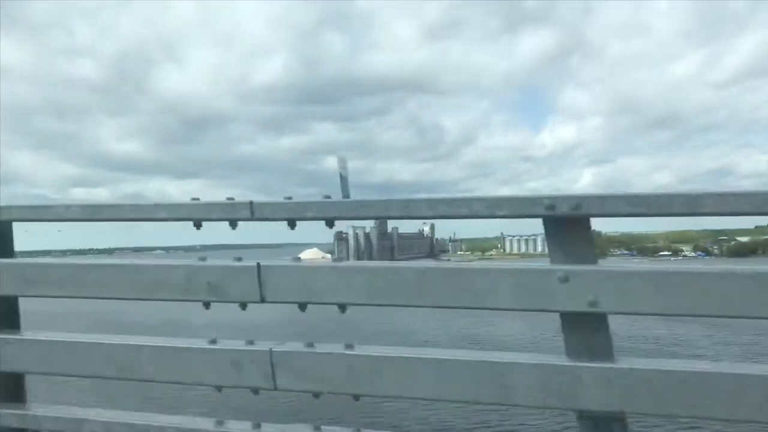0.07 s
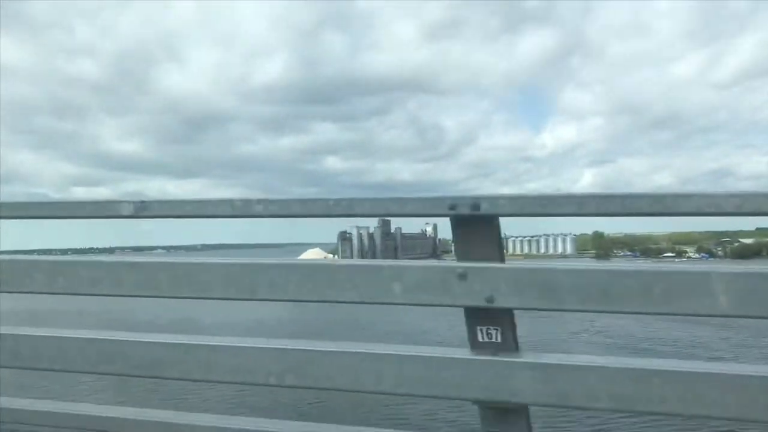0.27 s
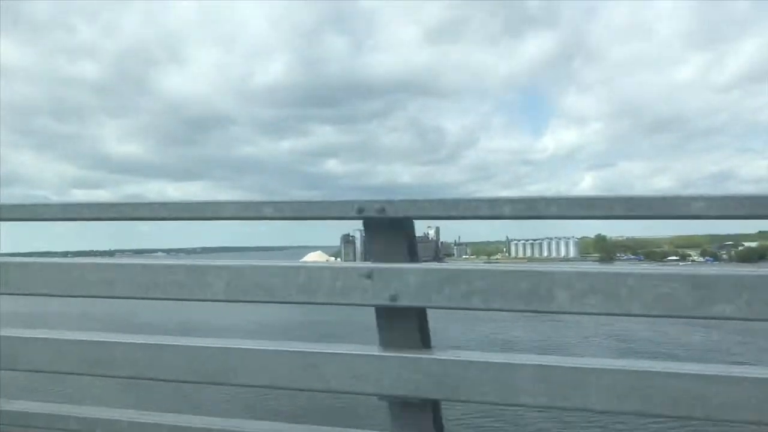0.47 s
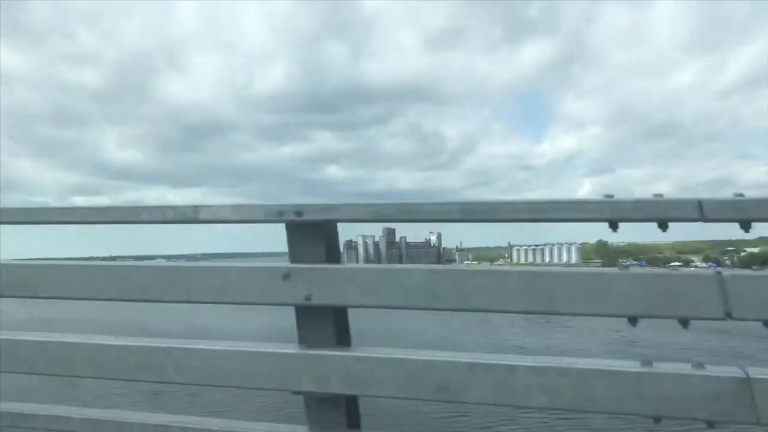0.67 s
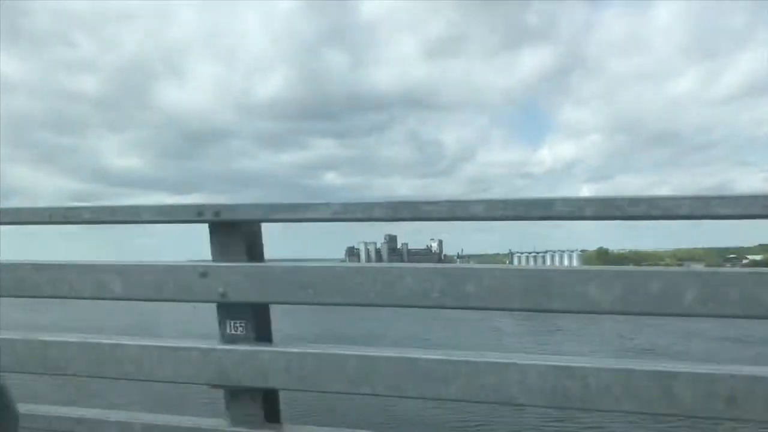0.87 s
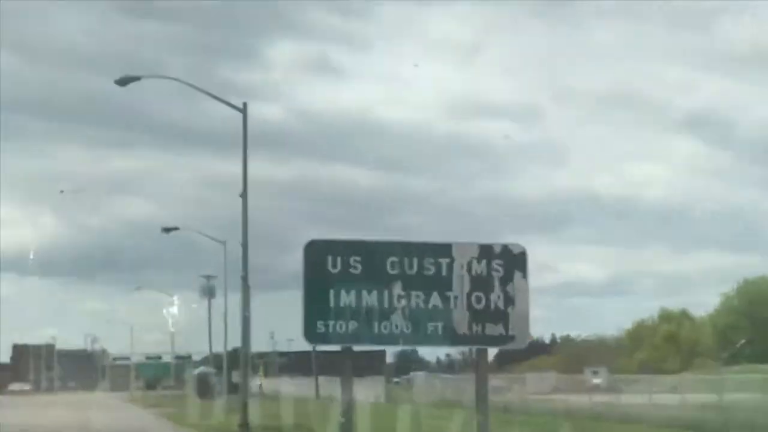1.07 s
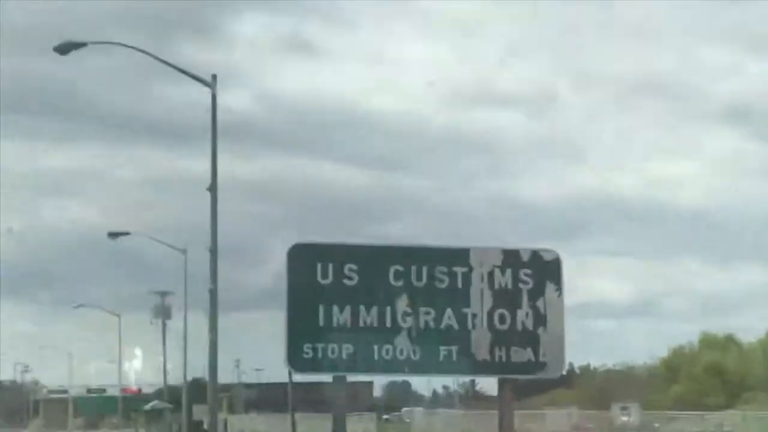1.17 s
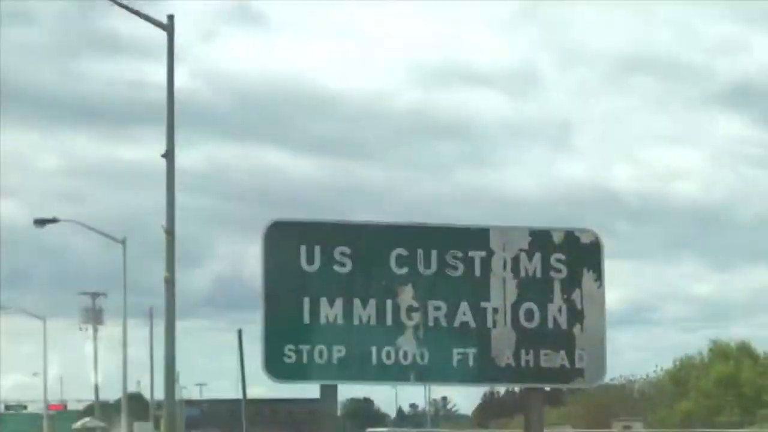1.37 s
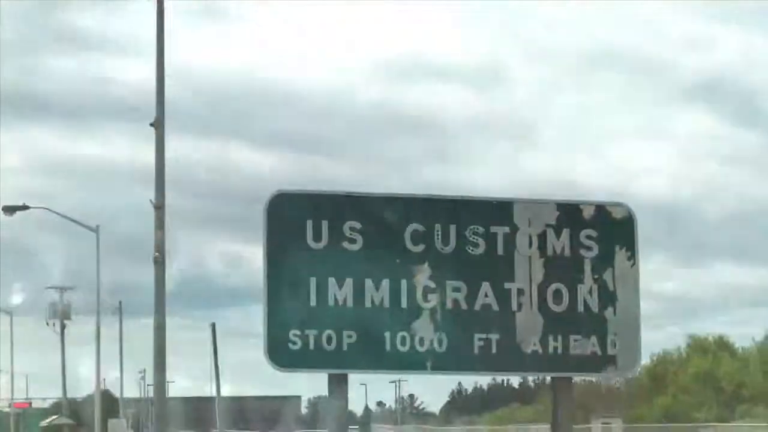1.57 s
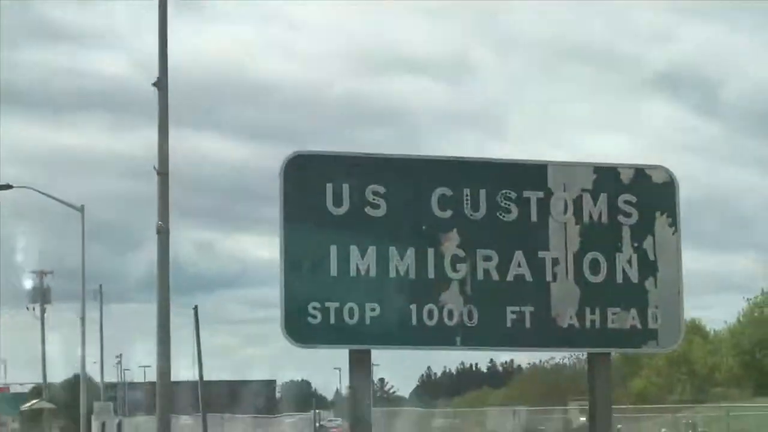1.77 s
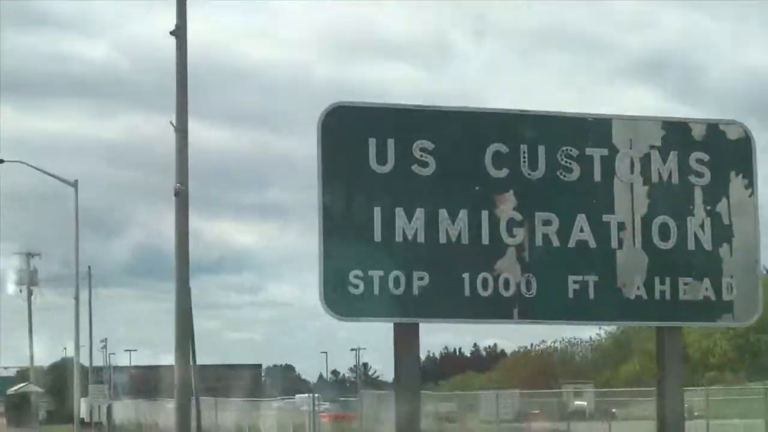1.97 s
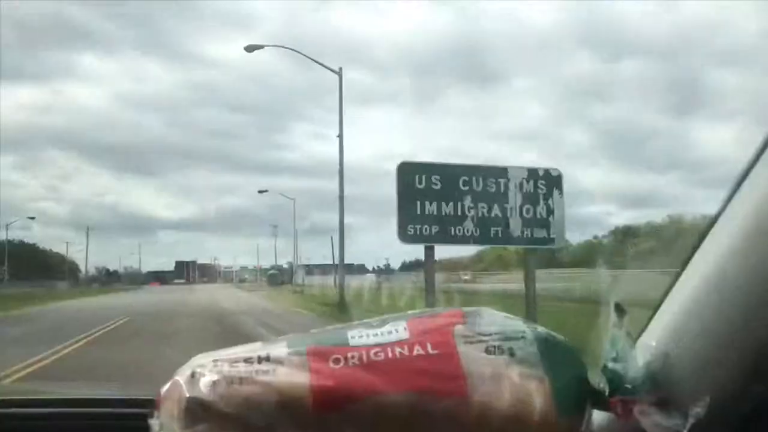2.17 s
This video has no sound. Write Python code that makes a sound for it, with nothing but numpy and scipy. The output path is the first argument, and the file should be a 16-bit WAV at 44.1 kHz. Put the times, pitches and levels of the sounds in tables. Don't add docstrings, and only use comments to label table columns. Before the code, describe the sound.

Car tyres hum over steel bridge grating for about a second, pulsing at the joints; a quick cut brings quieter, boomy road noise, body bumps and tiny plastic rattles, captured close inside the cabin.

```python
import sys
import numpy as np
from scipy import signal
from scipy.fft import rfft, irfft, next_fast_len
from scipy.io import wavfile
from scipy.ndimage import uniform_filter1d, map_coordinates

SR = 44100
rng = np.random.default_rng(int(sys.argv[2]) if len(sys.argv) > 2 else 0)


def volts_from_decibels(level):
    exponent = np.asarray(level, float) / 20
    return 10 ** exponent


def store_pcm(level_fs):
    pcm = np.round(np.clip(level_fs, -1, 1) * 32767).astype(np.int16)
    wavfile.write(sys.argv[1], SR, np.atleast_2d(pcm).T)


N = 97593

# start_s, bright_db, dull_db
TRIM_TICKS = [
    (0.9128, -45.5, -54),
    (1.0664, -61.5, -61),
    (1.2366, -61, -59),
    (1.3503, -58.5, -65),
    (1.4114, -60, -56.5),
    (1.5868, -54.5, -58.5),
    (1.6054, -54, -57),
    (1.696, -55, -64),
    (1.735, -47, -53),
    (1.7644, -57, -57.5),
]
# start_s, level_db
DASH_KNOCKS = [
    (1.066, -45),
    (1.172, -41),
    (1.948, -47),
]
# freq_hz, density_db_per_hz
KNOCK_SPECTRUM = [(450, -8), (520, 0), (720, -1), (850, -10)]
# start_s, length_s, pitch_hz, level_db
TRIM_SQUEAKS = [
    (1.513, .024, 2780, -60),
    (1.28, .02, 4000, -73),
    (1.94, .02, 2900, -68),
]
# start_s, end_s, over_calm_hiss_db
SHAKE_FITS = [(1.05, 1.145, 4.5), (1.145, 1.25, 1.5), (1.40, 1.47, 5), (1.47, 1.50, 3.5), (1.50, 1.58, 4.5),
              (1.58, 1.72, 6), (1.72, 1.775, 7), (1.775, 1.92, 3.5), (1.92, 2.0, 6.5), (2.0, 2.055, 5.5),
              (2.195, 2.3, 6)]
# freq_hz, density_db_per_hz
HISS_SPECTRUM = [(1200, -11), (2500, -4.5), (5000, -6.5), (8000, -10.5), (10500, -13), (13000, -11),
                 (15000, -14.5), (15700, -15)]
# freq_hz, density_db_per_hz
ROAD_SPECTRUM = [(25, -33), (45, -2.5), (210, -5.5), (260, -18), (400, -22.5), (470, -30.5), (1000, -29.5),
                 (3500, -55.5)]
# freq_hz, density_db_per_hz
TYRE_SPECTRUM = [(250, -10.5), (300, -3.5), (370, 3), (420, -4.5), (460, -17)]
# time_s, boom_db
ROAD_BUMPS = [
    (1.05, -31.5),
    (1.198, -36.5),
    (1.404, -29),
    (1.562, -30.5),
    (1.614, -23.5),
    (1.982, -34),
    (2.21, -34),
]
# freq_hz, density_db_per_hz
BOOM_SPECTRUM = [(22, -32), (38, 2.5), (95, -7), (112, 0), (135, -16), (230, -24.5), (300, -45.5)]
# start_s, length_s, pitch_hz, peak_db
BODY_THUMPS = [(1.08, 0.078, 46.2, -20.5), (1.27, 0.04, 101.5, -37.5), (1.36, 0.057, 106.4, -16),
               (1.395, 0.059, 112, -14), (1.44, 0.071, 108.4, -20), (1.36, 0.14, 57.7, -21),
               (1.57, 0.096, 140.7, -22), (1.54, 0.12, 69.4, -20.5), (1.64, 0.17, 39.8, -21),
               (1.69, 0.041, 72.5, -20), (1.70, 0.078, 109.6, -17), (1.86, 0.038, 56, -23),
               (1.91, .07, 87.2, -18), (2.01, 0.045, 42, -21), (2.15, 0.086, 107.4, -28)]
# freq_hz, width_hz, rms_db
DECK_RINGS = [(83.3, 10, -26.5), (112, 20, -32.5), (303, 100, -36), (424.5, 14, -58), (597.5, 60, -39.5),
              (670, 90, -44.5), (1700, 370, -62), (2618, 340, -65), (3020, 280, -69)]
# freq_hz, density_db_per_hz
DECK_SPECTRUM = [(25, -31.5), (45, -4.5), (160, -5.5), (450, -25), (900, -35), (2200, -48.5), (3400, -56.5),
                 (5000, -75)]
# time_s, level_db
PANEL_GRIP = [
    [(0.0, -28.5), (0.028, -14), (0.05, -11), (0.325, -25.5)],
    [(0.325, -17), (0.347, -18), (0.391, -12), (0.525, -21), (0.555, -16.5), (0.635, -21)],
    [(0.635, -21.5), (0.683, -16), (0.743, -14), (0.841, -23), (0.933, -16.5), (0.966, -29.5)],
    [(0.966, -16), (0.99, -14), (1.02, -17.5)],
]
# time_s, slip_cycles
PANEL_JOINTS = [
    (0, .7),
    (.325, .45),
    (.965, 0.42),
]
# bar_rate_multiple, level_db, grip_follow_0_to_1
DRONE_ORDERS = [(.5, -20.5, .3), (1.5, -28.5, 0.4), (2, -21.5, 0), (2.5, -32, .2), (3, -38, 1),
                (3.5, -54.5, .2), (4, -41.5, 1), (5, -50.5, .3), (6, -51, .3)]


def unit(x):
    return x / np.sqrt(np.mean(x ** 2) + 1e-20)


def curve(rows):
    time_s, value = np.transpose(rows)
    return np.interp(np.arange(N) / SR, time_s, value)


def wobble(rate_hz):
    knots = rng.standard_normal(int(N * rate_hz / SR) + 4)
    return map_coordinates(knots, [np.arange(N) * rate_hz / SR])


def filtered(x, response):
    size = next_fast_len(N + 8192)
    return irfft(rfft(x, size) * response(np.fft.rfftfreq(size, 1 / SR)), size)[:N]


def coloured(x, spectrum):
    freq_hz, level_db = np.transpose(spectrum)

    def response(hz):
        return volts_from_decibels(np.interp(np.log(hz + 1), np.log(freq_hz + 1), level_db, -120, -120))

    return unit(filtered(x, response))


def noise(patchy_db=2):
    z = signal.stft(rng.standard_normal(N + 512), nperseg=512)[2]
    field = uniform_filter1d(rng.standard_normal(z.shape), size=2, axis=0)
    field = uniform_filter1d(field, size=5, axis=1)
    return signal.istft(z * volts_from_decibels(patchy_db * unit(field)), nperseg=512)[1][:N]


def bursts(rows):
    t, out = np.arange(N) / SR, np.zeros(N)
    for (start_s, length_s, hz, db), phase in zip(rows, rng.random(len(rows))):
        envelope = np.sin(np.pi * np.clip((t - start_s) / length_s, 0, 1)) ** 2
        out += volts_from_decibels(db) * envelope * np.sin(2 * np.pi * (hz * (t - start_s) + phase))
    return out


def trim():
    tick_t60_s, tail_t60_s, tail_db = .008, .034, -8
    dull_t60_s, knock_t60_s, knock_rise_s = .043, .13, .004
    bright_spectrum = [(5000, -11), (7500, -3.5), (10500, -8.5), (14000, -5), (15700, -5.5)]
    dull_spectrum = [(1200, 2), (3000, 0.5), (5500, -10.5)]
    bright, dull, knock = np.zeros(N), np.zeros(N), np.zeros(N)
    t = np.arange(SR // 10) / SR
    bright_decay = volts_from_decibels(-60 * t / tick_t60_s) + volts_from_decibels(tail_db - 60 * t / tail_t60_s)
    for start_s, bright_db, dull_db in TRIM_TICKS:
        i = round(start_s * SR)
        bright[i:][:len(t)] += volts_from_decibels(bright_db - 5) * bright_decay
        dull[i:][:len(t)] += volts_from_decibels(dull_db - 1.0 - 60 * t / dull_t60_s)
    for start_s, db in DASH_KNOCKS:
        rise = 1 - np.exp(-t / knock_rise_s)
        knock[round(start_s * SR):][:len(t)] += volts_from_decibels(db - 60 * t / knock_t60_s) * rise
    ticks = bright * coloured(noise(), bright_spectrum) + dull * coloured(noise(), dull_spectrum)
    return ticks + knock * coloured(noise(), KNOCK_SPECTRUM) + bursts(TRIM_SQUEAKS)


def road():
    road_db, road_follow, hiss_db = -36.5, .05, -72
    tyre_db, tyre_follow, fit_edge_s = -51.5, .77, .012
    t, boom_db = np.arange(N) / SR, curve(ROAD_BUMPS)
    shake_db = np.zeros(N)
    for start_s, end_s, db in SHAKE_FITS:
        rise = np.clip((t - start_s) / fit_edge_s, 0, 1)
        fall = np.clip((t - end_s) / fit_edge_s, 0, 1)
        shake_db += db * (rise - fall)
    boom = volts_from_decibels(boom_db) * coloured(noise(patchy_db=0.0), BOOM_SPECTRUM)
    roll_gain = volts_from_decibels(road_db + road_follow * shake_db + 0.71 * wobble(12))
    roll = roll_gain * coloured(noise(), ROAD_SPECTRUM)
    hiss = volts_from_decibels(hiss_db + shake_db + 0.87 * wobble(40)) * coloured(noise(), HISS_SPECTRUM)
    tyre_gain = volts_from_decibels(tyre_db + tyre_follow * (boom_db - boom_db[SR:].mean()))
    tyre = tyre_gain * coloured(noise(), TYRE_SPECTRUM)
    return tyre + boom + bursts(BODY_THUMPS) + roll + hiss


def deck(cycles):
    rolling_db, gated_share, fade_db_per_s = -26.5, .18, 3
    hum_hz, hum_db = 203.1, -29.5
    panel_s, flex_peak_s, flex_db = .32, .29, 4
    hiss_db, hiss_start_s = -66, .04
    t = np.arange(N) / SR

    def pulsed():
        return noise(patchy_db=1.45) * (1 + gated_share * np.cos(2 * np.pi * cycles))

    out = volts_from_decibels(rolling_db + 0.41 * wobble(6.7)) * coloured(pulsed(), DECK_SPECTRUM)
    out += volts_from_decibels(hum_db + 3.6 * wobble(9)) * np.sin(2 * np.pi * (hum_hz * t + 0.046 * wobble(18)))
    swell_db = flex_db * np.cos(2 * np.pi * (t - flex_peak_s) / panel_s)
    for k, (hz, width_hz, db) in enumerate(DECK_RINGS):
        def resonance(f):
            return (1j * f * width_hz / (hz * hz - f * f + 1j * f * width_hz)) ** 2

        ring = filtered(pulsed(), resonance)
        out += volts_from_decibels(db + 0.5 * wobble(6) + swell_db * (k == 0)) * unit(ring)
    hiss_gain = volts_from_decibels(hiss_db + .8 * wobble(8.7) - 6 * (t < hiss_start_s))
    return out * volts_from_decibels(-fade_db_per_s * (t - .5)) + hiss_gain * coloured(noise(), HISS_SPECTRUM)


def bar_cycles():
    bar_hz, drift_cycles = 312.96, .04
    slip_s, settle_s, settle_cycles = .018, .05, .2
    t = np.arange(N) / SR
    cycles = bar_hz * t + drift_cycles * wobble(25)
    for joint_s, slip_cycles in PANEL_JOINTS:
        cycles += slip_cycles * np.clip((t - joint_s) / slip_s + .5, 0, 1)
        cycles += settle_cycles * (1 - np.exp(-np.clip(t - joint_s, 0, None) / settle_s))
    return cycles


def drone(cycles):
    flutter_db, overtone_flutter_db, overtone_drift_cycles = .7, 4, .07
    notch_s, notch_db = .011, -12
    t = np.arange(N) / SR
    grip_db = uniform_filter1d(curve(np.vstack(PANEL_GRIP)), size=300)
    tone_db = grip_db + flutter_db * wobble(40)
    for joint_s, _ in PANEL_JOINTS:
        tone_db += notch_db * np.exp(-((t - joint_s) / notch_s) ** 2)
    out = np.sqrt(2) * volts_from_decibels(tone_db) * np.sin(2 * np.pi * cycles)
    mean_db = grip_db[:SR].mean()
    for multiple, db, follow in DRONE_ORDERS:
        level_db = mean_db + db + follow * (grip_db - mean_db) + overtone_flutter_db * wobble(22)
        phase = multiple * cycles + rng.random() + overtone_drift_cycles * wobble(40)
        out += volts_from_decibels(level_db) * np.sin(2 * np.pi * phase)
    return out


def scene():
    fade_out_s, cut_s, fade_in_s, soft_start_s = 1.0104, 1.04, 1.0626, .004
    t = np.arange(N) / SR
    cycles = bar_cycles()
    falling = np.clip((cut_s - t) / (cut_s - fade_out_s), 0, 1)
    rising = np.clip((t - cut_s + 0.0022) / (fade_in_s - cut_s), 0, 1)
    deck_gain = np.clip(t / soft_start_s, 0, 1) * np.sin(np.pi / 2 * falling) ** 2
    road_gain = np.sin(np.pi / 2 * rising) ** 2
    mix = deck_gain * (drone(cycles) + deck(cycles)) + road_gain * road() + trim()
    return mix[None]


def top_cut(x):
    return signal.sosfilt(signal.butter(12, 15710, fs=SR, output="sos"), x)


def record(dry):
    return top_cut(dry)


dry = scene()
out = record(dry)
store_pcm(out)
```